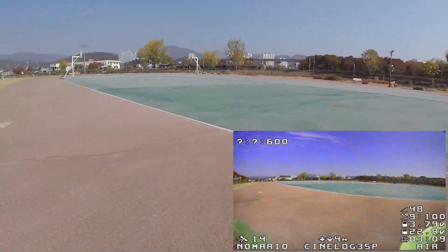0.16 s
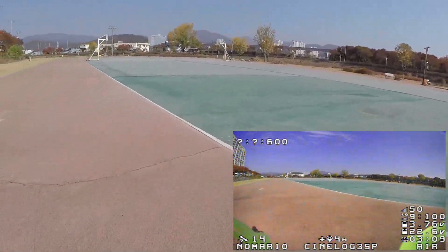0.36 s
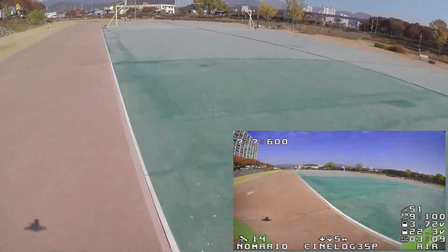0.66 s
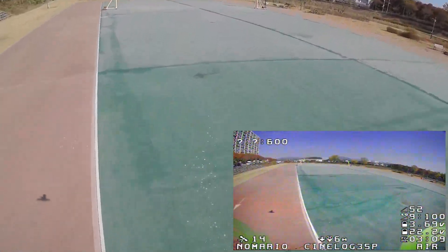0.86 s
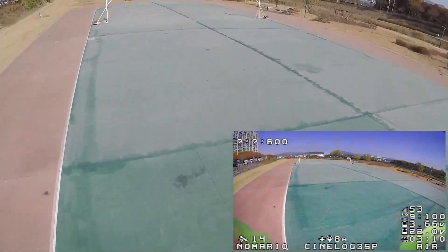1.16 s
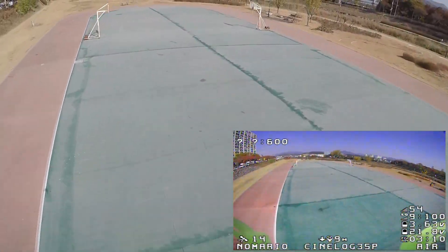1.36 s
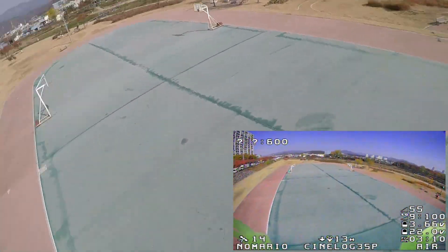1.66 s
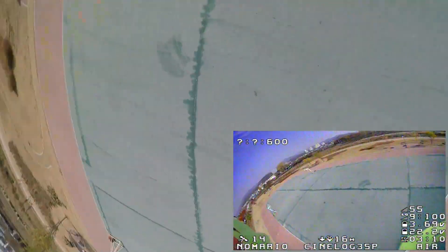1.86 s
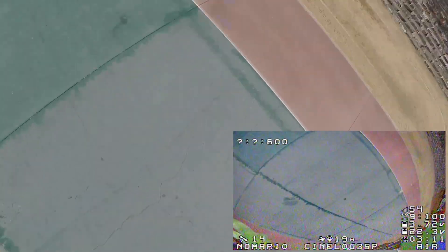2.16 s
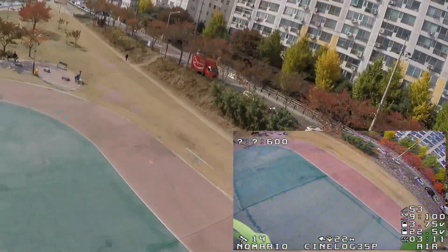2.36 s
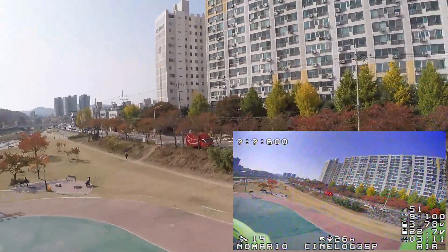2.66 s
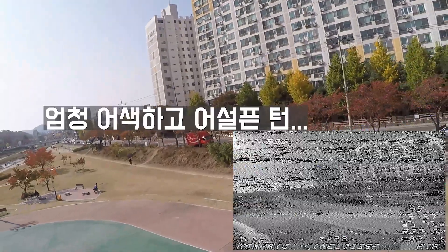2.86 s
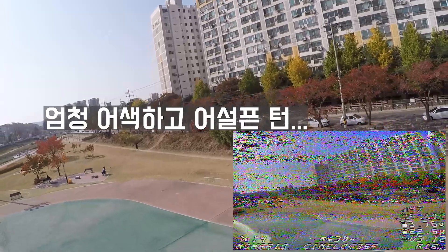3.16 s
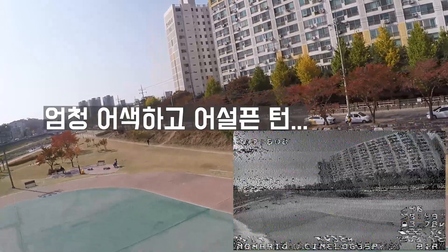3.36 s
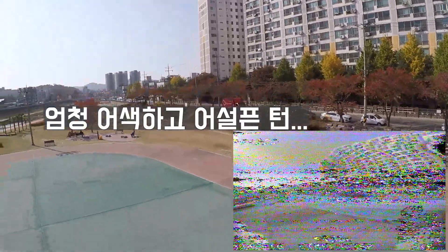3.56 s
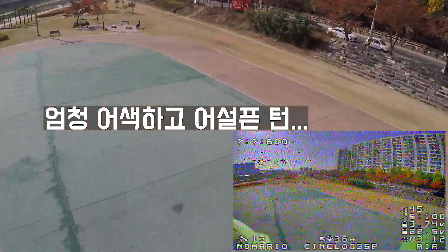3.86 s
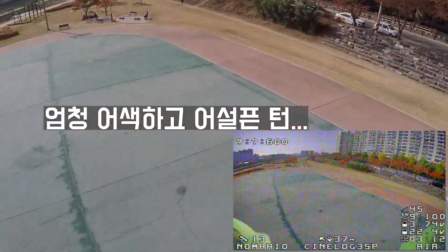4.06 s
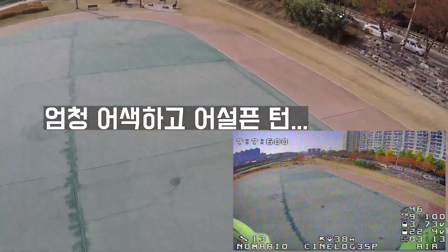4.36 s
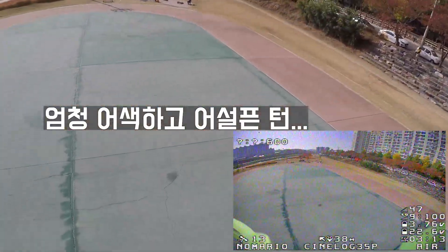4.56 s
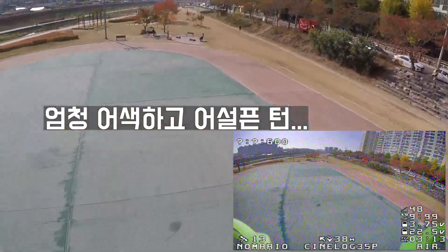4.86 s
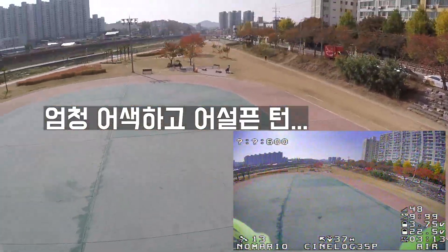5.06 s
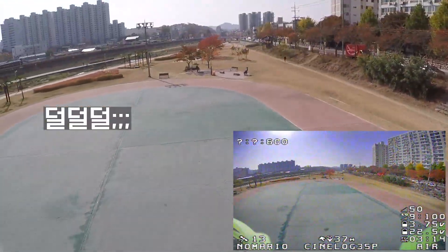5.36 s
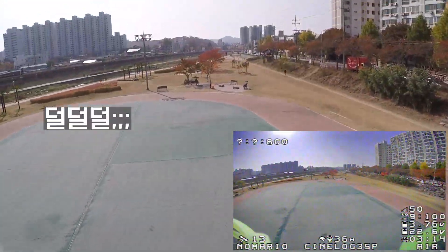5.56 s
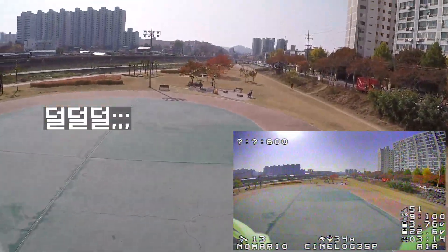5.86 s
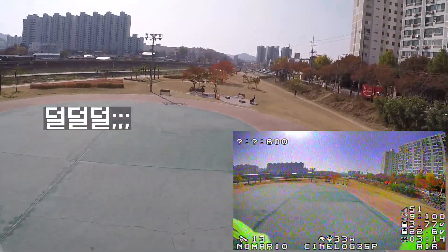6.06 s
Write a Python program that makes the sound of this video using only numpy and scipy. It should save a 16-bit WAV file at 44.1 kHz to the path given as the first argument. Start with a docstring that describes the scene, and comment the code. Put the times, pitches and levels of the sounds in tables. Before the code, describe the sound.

Heard from a small drone's own mono microphone outdoors: several close rotors whine in a rough, hissy cluster, climbing steadily, then plunging in pitch. A tumbling turn brings heavy low wind rumble, rush and rapid thumps with short motor spurts. The wind eases while the throttle swings up and down, then low wind rises again with two separate thumps.

```python
"""Outdoors, a small racing drone heard from aboard, by the mono microphone that it carries.
First its three-bladed rotors climb: three whines, each a stack of sines on its own blade rate, over a hiss
of banded noise that brightens as it gets louder. Near 1.5 s the whines plunge, and in a tumbling turn about
2 s the wind buffets the microphone port with rumble, rush and thumps. The throttle then swings up and down,
and from about 4.5 s the wind rises again in a fast descent, with two more thumps."""
import sys
import numpy as np
from scipy import signal
from scipy.io import wavfile
from scipy.ndimage import uniform_filter1d

SR = 44100
rng = np.random.default_rng(int(sys.argv[2]) if len(sys.argv) > 2 else 0)


def output_pcm(signal):
    """Save a mono or channel-first signal as 16-bit PCM at the path in sys.argv[1].

    Samples are clipped to [-1, 1] before scaling.
    """
    pcm = np.clip(np.atleast_2d(signal).T, -1, 1) * 32767
    wavfile.write(sys.argv[1], SR, np.round(pcm).astype(np.int16))


N = 273952

# Wind on the port. Each row: time in seconds, rumble level in dB, rush above the rumble in dB (before RUSH_LIFT_DB).
WIND_LEVELS = [(0.0, -22.5, -20), (0.08, -36.5, -15), (0.3, -44, -26), (1.2, -40.5, -19), (1.6, -42.5, 2),
               (1.76, -40.5, -1), (1.82, -42, 9), (1.9, -19.5, 0), (1.98, -21, -7.5), (2.1, -16.5, -14),
               (2.18, -19.5, -13.5), (2.24, -19, -9), (2.29, -21, -16), (2.38, -21.5, -10),
               (2.42, -22, -4.5), (2.46, -26.5, -0.5), (2.51, -28.5, 1.5), (2.62, -34, 8), (2.7, -32.5, 6),
               (2.8, -29.5, -5.5), (3.15, -36, 5), (3.3, -32, 0), (3.4, -36, -1), (3.75, -45, -8),
               (4.2, -44.5, -12), (4.35, -55, -15), (4.45, -42, -6), (4.52, -32.5, -6), (4.8, -30, -13),
               (5.05, -26, -10), (5.42, -24.5, -9.5), (5.6, -27.5, -3), (5.8, -27, -10), (5.97, -24, -16),
               (6.21, -27, -14.5)]
# The wind lets go of the port as the craft tumbles. Each row: deepest point, onset and return in seconds, change in dB.
WIND_LULLS = [(2.07, 0.038, 0.019, -9.5), (2.14, 0.028, 0.039, -3.5), (2.21, 0.024, 0.026, -13),
              (2.33, 0.11, 0.039, -6)]
# Colour of the low wind rumble. Each row: frequency in Hz, relative level in dB per Hz.
RUMBLE_COLOUR = [(20, -5), (40, 3.5), (80, -2.5), (160, -7), (300, -14), (600, -49)]
# Colour of the wind's rush and of the thumps' flutter. Each row: frequency in Hz, relative level in dB per Hz.
RUSH_COLOUR = [(100, -1), (200, -0.5), (350, 3), (600, -1), (1000, -5.5), (2000, -10), (4000, -22.5)]
# Single eddies on the port. Each row: start in seconds, level in dB before the band-pass, swing-back time in ms.
EDDY_THUMPS = [(1.904, -7, 0.42), (1.921, -9, 0.42), (1.949, -6.5, 0.37), (2.008, -17, 0.43),
               (2.029, -8.5, 0.69), (2.098, -14, 0.39), (2.11, -20, .4), (2.15, -23, .4), (2.187, -16, .4),
               (2.232, -12, .1), (2.289, -10.5, 0.42), (2.389, -26, .4), (4.971, -7, 2.4),
               (5.252, -11, 2.2)]
# Colour of the blade hiss, before its tilt. Each row: frequency in Hz, relative level in dB per Hz.
BLADE_HISS_COLOUR = [(59, -32), (100, -21), (610, -12.5), (1300, -5.5), (1740, -7.5), (2710, -2),
                     (3960, 0.5), (4680, -3), (9980, -11.5), (15200, -22.5)]
# The throttle, before smoothing. Each row: time in seconds, blade rate of the middle rotor in Hz.
THROTTLE_CURVE = [(0.0, 935), (0.05, 992), (0.2, 1117), (0.42, 1198), (0.62, 1274), (0.82, 1341),
                  (0.95, 1370), (1.1, 1390), (1.35, 1462), (1.42, 1415), (1.455, 1345), (1.49, 1117),
                  (1.53, 803), (1.645, 461), (1.68, 618), (1.754, 773), (1.87, 564.6), (2.1, 774),
                  (2.345, 766), (2.39, 682.5), (2.61, 691), (2.65, 861.5), (2.75, 1043), (2.92, 1066),
                  (2.96, 993), (3.02, 686.5), (3.08, 604), (3.13, 675), (3.17, 658.8), (3.25, 589),
                  (3.33, 985), (3.52, 1184), (3.59, 1168), (3.78, 808.5), (3.85, 836), (3.92, 1012),
                  (4.04, 1118), (4.2, 1006), (4.32, 710.5), (4.4, 579), (4.455, 546.6), (4.52, 832),
                  (4.59, 915), (4.7, 967), (4.8, 956.5), (4.95, 912.6), (5.3, 864), (5.36, 818),
                  (5.43, 721), (5.5, 672), (5.63, 686.4), (5.78, 589.7), (5.85, 569.6), (5.95, 780),
                  (6.06, 884), (6.13, 904), (6.21, 901)]
# Steering drives the rotors apart. Each row: time in seconds, speed of the fast and of the slow rotor
# as ratios to the middle one.
STEERING_RATIOS = [(0.0, 1.17, 0.86), (0.12, 1.13, .91), (0.4, 1.045, 0.92), (0.8, 1.006, 0.94),
                   (1.1, 1.01, 0.94), (1.35, 0.98, 0.93), (1.45, 1.006, 0.92), (1.58, 1.08, .9),
                   (1.645, 1.57, 0.83), (1.68, 1.19, .87), (1.76, 1.21, .87), (1.87, 1.06, 0.59),
                   (1.92, 1.68, 0.78), (1.99, 1.45, 0.8), (2.016, 1.78, .87), (2.06, 1.6, .87),
                   (2.12, 1.44, 0.94), (2.2, 1.17, 1), (2.47, 1.3, 0.83), (2.61, 1.31, 0.88),
                   (2.66, 1.13, 0.98), (2.8, 1.03, .985), (2.91, 1.02, 0.92), (3.03, 1.04, 0.86),
                   (3.12, 1.1, 0.9), (3.17, 1.26, 0.79), (3.25, 1.35, .93), (3.33, 1.11, 0.94),
                   (3.45, 1.08, 0.93), (3.58, 1.065, 0.92), (3.72, 1.12, 0.94), (3.81, 1.19, 0.96),
                   (3.92, 1.2, 0.91), (4.03, 1.09, .925), (4.2, 0.96, 0.93), (4.32, 1.01, 0.94),
                   (4.45, 0.95, 0.91), (4.55, 1.053, 0.95), (4.78, 1.09, .96), (4.92, 1.05, .92),
                   (5.0, 1.03, .925), (5.35, 1.05, 0.92), (5.5, 1.09, 0.89), (5.7, 1.07, 0.86),
                   (5.87, 1.03, .83), (6.06, 1.04, .92), (6.21, 1.03, .93)]
# How hard the blades bite the air, beyond what speed gives. Each row: time in seconds, level in dB.
BLADE_BITE = [(0.0, 0.5), (0.6, -0.5), (0.8, -3), (1.42, -2), (1.49, -7), (1.57, -12), (1.72, -4.5),
              (1.89, -3), (2.1, -11), (2.32, -13.5), (2.47, -13.5), (2.6, -2.5), (2.7, -2), (2.96, -2.5),
              (3.06, -5), (3.23, -4.5), (3.3, 1.5), (3.6, 0.5), (4.44, 0), (4.67, 1.5), (5.3, -0.5),
              (5.83, 2), (6.21, 1)]
# Spurts of the motors as the craft catches itself. Each row: peak, rise and fall in seconds, level in dB.
MOTOR_SPURTS = [(1.755, 0.03, 0.036, 0.5), (1.92, .03, 0.04, 9.5), (2.02, 0.069, 0.057, 12.5),
                (2.21, 0.042, 0.052, 3), (2.345, 0.027, 0.14, 15.5), (2.52, 0.029, 0.057, 7),
                (3.13, .06, 0.079, 1.5)]
# Low overtones against the blade noise. Each row: time in seconds, fast, middle and slow rotor in dB.
WHINE_ABOVE_NOISE = [(0.0, 0, 6.5, -10), (0.2, -10, 5, -9.5), (0.45, -4, 0.5, -3.5), (0.7, -1, 0, -3),
                     (0.95, 1, -0.5, -2), (1.2, 0, 0.5, 1.5), (1.43, 2, -1.5, 0), (1.6, 4.5, 4, 3.5),
                     (1.68, 4.5, 2, -5), (1.76, 6.5, 3.5, -14), (1.88, -3, -11, -20), (1.92, -3, -17, -21),
                     (1.97, 7, -21, -21), (2.025, 3.5, -25, -24), (2.11, -4, -18, -18),
                     (2.18, -17, -16, -20), (2.35, -0.5, 0.5, -25), (2.55, -2, 4, -20),
                     (2.66, -18, 2.5, 0.5), (2.8, -1.5, 6.5, -0.5), (2.93, -0.5, -6, 1), (3.05, 2, -7, 0),
                     (3.15, 2, 9.5, 0), (3.25, 3, 0, 3), (3.32, -4, 5, -2), (3.55, -8, -6, -1.5),
                     (3.8, -10, 4.5, -11), (3.95, -4.5, 4, -7), (4.15, -10, 2, -6), (4.4, -0.5, -9, -5.5),
                     (4.55, 1.5, -2, -1.5), (5.0, -2, 4, -5), (5.3, 4, 0.5, -2.5), (5.5, 2, 6, -0.5),
                     (5.7, -7, 8, -4), (5.85, -6, 9, -6), (6.0, -1.5, 9, -5.5), (6.21, 3, 2, -2.5)]
# Base balance of each rotor, fast to slow. Each row: blade tone and high overtones in dB against the low overtones,
# lift of the sixth multiple in dB.
ROTOR_VOICES = [(-1.5, -5.5, 2), (-7.5, -9, -2.5), (-1.5, -5, -1)]
# Lines of one rotor swell or fade for a while. Each row: rotor (0 fast, 1 middle, 2 slow),
# lines (0 blade tone, 1 high overtones, 2 sixth multiple), peak, rise and fall in seconds, change in dB.
LINE_SWELLS = [(0, 0, 0.18, 0.11, 0.26, 9.5), (1, 0, 0.885, 0.58, 0.45, 21), (0, 0, 0.808, 0.28, 0.41, -20),
               (2, 0, .95, 0.25, 0.21, -6), (0, 0, 1.46, 0.081, 0.068, 10), (1, 0, 1.55, 0.11, .1, 12),
               (0, 0, 1.8, 0.13, 0.087, 7.5), (1, 0, 2.612, 0.24, 0.18, 14.5), (0, 0, 4.9, .2, 0.14, -21),
               (0, 0, 2.8, 0.099, 0.15, 5), (0, 0, 3.205, 0.35, .12, -25), (1, 0, 3.52, 0.35, 0.37, 2),
               (1, 0, 3.95, 0.12, 0.28, -3), (0, 0, 5.03, 0.26, 0.18, 9.5), (2, 0, 5.23, 0.43, .3, -12),
               (0, 0, 5.7, 0.19, .12, 12), (0, 1, .2, 0.17, 0.29, 8), (1, 1, 0.58, 0.68, 0.68, 11),
               (0, 1, 1.574, 0.23, 0.32, 0), (0, 1, 2.66, 0.31, 0.16, -6), (1, 1, 3.36, 0.17, 0.38, -7),
               (0, 1, 3.2, .15, 0.2, -5), (0, 1, 3.55, 0.17, 0.18, 10), (2, 1, 3.68, 0.26, 0.19, 1),
               (2, 2, 3.62, .25, 0.19, 11.5), (2, 2, 3.82, 0.13, .08, 14), (1, 2, 3.9, 0.089, .1, 4.5),
               (1, 1, 4.03, 0.18, 0.29, 7), (2, 1, 4.0, .12, 0.23, -12), (0, 1, 4.706, 0.44, 0.85, 7.5),
               (1, 1, 5.3, 0.26, 0.26, -8), (0, 1, 5.88, .3, 0.33, -11)]
# Low overtones before the body's colouring. Each row: multiple of the blade rate, fast, middle and slow rotor in dB.
LOW_OVERTONES = [(2, -1, -3.5, 2.5), (3, -3.5, -5.5, -2)]
# Unbalance. Each row: multiple of the shaft rate, level in dB against the low overtones.
SHAFT_LINES = [(1, -21), (5, -69), (7, -49)]
# The body's colouring of multiples 2 and 3. Each row: frequency in Hz, gain in dB.
BODY_LOW = [(1100, -0.5), (1700, -1.5), (2100, -1.5), (2700, 1.5), (3200, 0), (4300, 3.5)]
# The body's colouring of multiples 4 to 8. Each row: frequency in Hz, gain in dB.
BODY_HIGH = [(2500, 3), (3800, 0), (4500, -6), (5300, -4.5), (6100, -4), (6800, -11), (8200, -23.5),
             (9600, -8.5), (10500, -10), (12000, -19)]

BLADES = 3
INERTIA_S = 0.0287   # moving average that rounds the corners of the throttle
# blade noise before bite and spurts: level from the knee up, and its fall per octave of speed under the knee
FULL_DB, KNEE_HZ, BELOW_KNEE_DB = -33, 1029, 10.5
HIGH_PER_OCTAVE_DB = 6   # high overtones gain this per octave above the knee and lose it below
RUSH_LIFT_DB = 2
THUMP_MS = 2.51   # time unit of a thump; its push peaks two units after the start
CUTOFF_HZ = 15420


def from_db(db):
    """Decibels to amplitude gain."""
    return 10 ** (np.asarray(db) / 20)


def rms_one(x):
    """Scales to rms 1."""
    return x / np.sqrt(np.mean(x ** 2) + 1e-20)


def in_time(rows):
    """Columns of a table as curves, one value a sample."""
    seconds, *columns = np.transpose(rows)
    return [np.interp(np.arange(N) / SR, seconds, column) for column in columns]


def bumps_db(rows):
    """Sum of straight rises and falls in dB, one for each row."""
    t = np.arange(N) / SR
    return sum(np.interp(t, [peak - rise, peak, peak + fall], [0, db, 0]) for peak, rise, fall, db in rows)


def drift(rate_hz):
    """Slow chance: noise at every 20th sample through a double one-pole low-pass; rms 1."""
    pole = np.exp(-2 * np.pi * rate_hz * 20 / SR)
    white = rng.standard_normal(N // 20 + 3002)
    slow = signal.lfilter([1], [1, -2 * pole, pole ** 2], white)[3000:]   # drops the filter's start
    return np.interp(np.arange(N) / 20, np.arange(len(slow)), rms_one(slow))


def banded_noise(colour, shared_db, own_db, rate_hz, tilt_db_per_octave=0):
    """Half-octave noise bands that flicker partly together; about rms 1 before the tilt, which pivots at 6 kHz."""
    hz, db = np.transpose(colour)
    edges = hz[0] * 2 ** np.arange(0, np.log2(hz[-1] / hz[0]) + 0.5, 0.5)
    white = rng.standard_normal((2, N))   # neighbouring bands take turns, so they stay independent
    together = drift(rate_hz)
    out, power = np.zeros(N), 0
    for k, (low, high) in enumerate(zip(edges, edges[1:])):
        band_pass = signal.butter(2, [low, min(high, 0.45 * SR)], "band", fs=SR, output="sos")
        centre = np.sqrt(low * high)
        colour_db = np.interp(np.log(centre), np.log(hz), db)
        flicker_db = shared_db * together + own_db * drift(rate_hz)
        band = signal.sosfilt(band_pass, white[k % 2]) * from_db(colour_db + flicker_db)
        power += np.mean(band ** 2)
        out += band * from_db(tilt_db_per_octave * np.log2(centre / 6000))
    return out / np.sqrt(power)


def wind():
    """Lumpy pressure on the port: a low rumble and a rush above it, swelling together."""
    rumble_db, rush_db = in_time(WIND_LEVELS)
    rumble = banded_noise(RUMBLE_COLOUR, shared_db=0.5, own_db=1.5, rate_hz=21)
    rush = banded_noise(RUSH_COLOUR, shared_db=1.0, own_db=2.0, rate_hz=12.7)
    lumps = from_db(1.38 * drift(12.5))
    level = from_db(rumble_db + bumps_db(WIND_LULLS)) * lumps
    return level * (rumble + from_db(rush_db + RUSH_LIFT_DB) * rush)


def thumps():
    """Each eddy pushes the membrane out, snaps it back and leaves a short flutter."""
    out, t = np.zeros(N), np.arange(N) / SR
    flutter = banded_noise(RUSH_COLOUR, shared_db=4, own_db=1.5, rate_hz=60)
    for start, db, back_ms in EDDY_THUMPS:
        u = (t - start) * 1000 / THUMP_MS - 2   # zero at the peak of the push
        push = np.exp(-1.3 * u ** 2) * (u <= 0)
        fade = np.exp(-np.abs(u) / 2.2) * (u > 0)
        outward = np.exp(-(u * THUMP_MS / back_ms) ** 2)
        rebound = (1 - outward) * (0.39 * flutter - 0.45)
        out += from_db(db) * (push + fade * (outward + rebound))
    port_band = signal.butter(2, [45, 700], "band", fs=SR, output="sos")
    return signal.sosfilt(port_band, out + 1e-18)


def hiss(noise_db):
    """Vortices shed by the blades: the louder, the brighter."""
    tilt = 0.225 * (noise_db + 38)   # dB per octave
    noise = banded_noise(BLADE_HISS_COLOUR, shared_db=0.0, own_db=0.96, rate_hz=9.8, tilt_db_per_octave=tilt)
    return from_db(noise_db + 7.0) * noise


def flight():
    """Blade rate of each rotor, and the level of the blade noise that speed, bite and spurts give."""
    middle_hz = uniform_filter1d(in_time(THROTTLE_CURVE)[0], int(INERTIA_S * SR), mode="nearest")
    fast, slow = in_time(STEERING_RATIOS)
    speed_db = FULL_DB + BELOW_KNEE_DB * np.minimum(np.log2(middle_hz / KNEE_HZ), 0)
    noise_db = speed_db + in_time(BLADE_BITE)[0] + bumps_db(MOTOR_SPURTS)
    return (fast * middle_hz, middle_hz, slow * middle_hz), noise_db


def line_levels(index, blade_hz, noise_db):
    """Levels of a rotor's blade tone, low and high overtones, and the lift of its sixth multiple."""
    low_db = noise_db + in_time(WHINE_ABOVE_NOISE)[index]

    def swollen(lines):
        swells = [row[2:] for row in LINE_SWELLS if row[0] == index and row[1] == lines]
        return ROTOR_VOICES[index][lines] + bumps_db(swells)

    high_db = swollen(1) + HIGH_PER_OCTAVE_DB * np.log2(blade_hz / KNEE_HZ)
    return low_db + swollen(0), low_db, low_db + high_db, swollen(2)


def rotor(blade_hz, levels_db, overtone_db, wobble, sway_db, rough):
    """Sines on the blade rate; the speed wobbles, and turbulent inflow sways and roughens each line."""
    tone_db, low_db, high_db, sixth_db = levels_db
    turn = 2 * np.pi * np.cumsum(blade_hz * (1 + wobble * drift(36.1))) / SR
    low_hz, low_gain_db = np.transpose(BODY_LOW)
    high_hz, high_gain_db = np.transpose(BODY_HIGH)

    def line(multiple):
        phase = multiple * turn + rng.uniform(0, 2 * np.pi)
        clean = from_db(sway_db * drift(11.0)) * np.cos(phase)
        # fast drifts spread a skirt of noise round the line: stronger up to multiple 3, ever wider above
        skirt, spread_hz = rough * np.sqrt(min(multiple, 3)), 70 + 8 * multiple
        noisy = drift(spread_hz) * np.cos(phase) + drift(spread_hz) * np.sin(phase)
        return np.sqrt(2) * (clean + skirt * noisy)

    low, high = np.zeros(N), np.zeros(N)
    for row, db in zip(LOW_OVERTONES, overtone_db):
        body_db = np.interp(row[0] * blade_hz, low_hz, low_gain_db)
        low += from_db(db + body_db) * line(row[0])
    for multiple, db in SHAFT_LINES:
        low += from_db(db) * line(multiple / BLADES)
    for multiple in range(4, 9):
        body_db = np.interp(np.log(multiple * blade_hz), np.log(high_hz), high_gain_db)
        high += from_db(body_db + sixth_db * (multiple == 6)) * line(multiple)
    return from_db(tone_db) * line(1) + from_db(low_db) * low + from_db(high_db) * high


def scene():
    """Wind and thumps on the port, hiss and three rotors close by, the same in both channels."""
    speeds_hz, noise_db = flight()
    shares_db = np.transpose(LOW_OVERTONES)[1:]
    whine = np.zeros(N)
    for k, blade_hz in enumerate(speeds_hz):
        levels_db = line_levels(k, blade_hz, noise_db)
        whine += rotor(blade_hz, levels_db, shares_db[k], wobble=0.0025, sway_db=1.6, rough=0.22)
    return np.tile(wind() + thumps() + hiss(noise_db) + whine, (2, 1))


def record(dry):
    """The microphone's signal: peaks are rounded, then a steep low-pass cuts the top."""
    rounded = 0.38 * np.tanh(dry / 0.46)
    return signal.sosfilt(signal.cheby2(24, 70, CUTOFF_HZ, fs=SR, output="sos"), rounded)


dry = scene()
out = record(dry)
output_pcm(out)
```